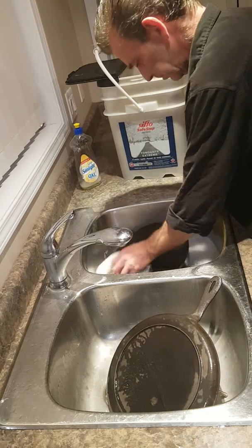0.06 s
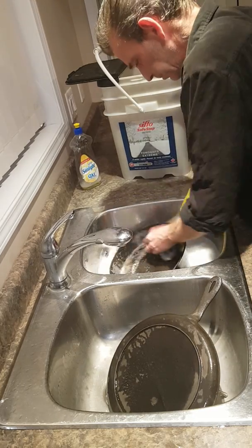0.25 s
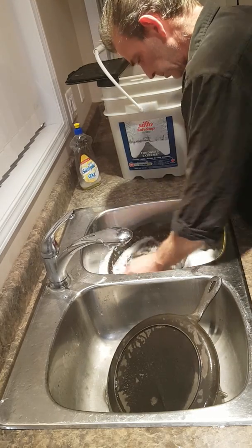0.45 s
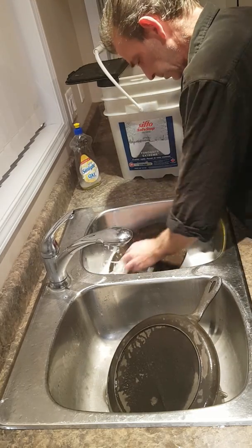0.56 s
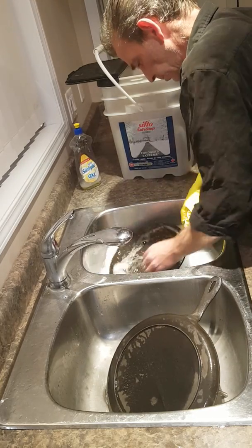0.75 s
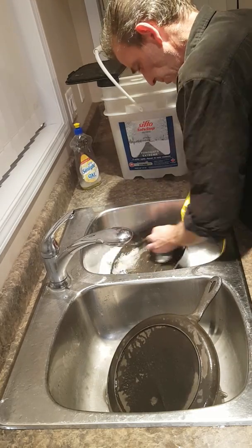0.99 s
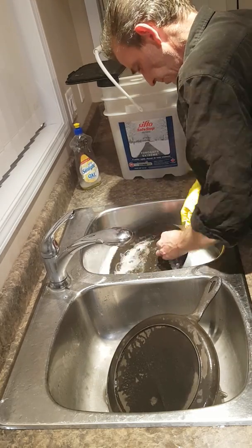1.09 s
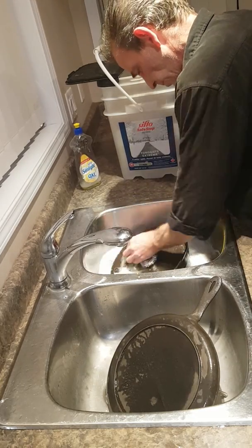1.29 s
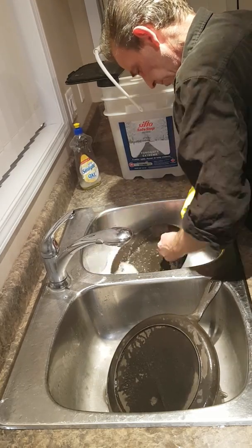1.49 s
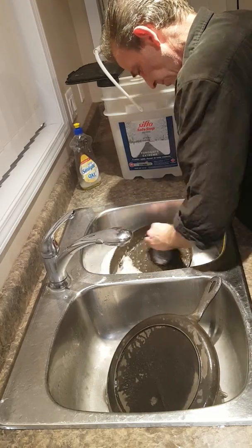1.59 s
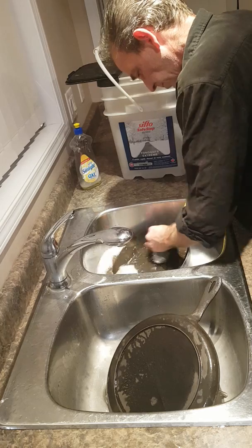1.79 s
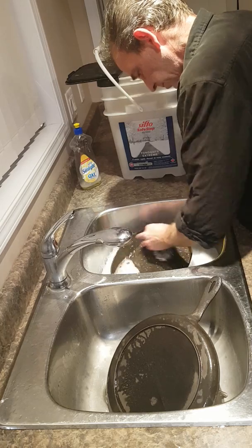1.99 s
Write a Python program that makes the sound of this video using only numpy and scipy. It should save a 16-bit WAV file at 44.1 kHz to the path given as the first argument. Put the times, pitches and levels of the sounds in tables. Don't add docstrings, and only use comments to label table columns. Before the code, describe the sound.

A cast iron pan is scoured in a steel sink, heard close in stereo. A faint stroke opens over quiet room noise and a low appliance hum. From 0.2 s brisk gritty hisses and dull rasps come with clanks and basin booms, clustered near 0.25, 0.75, 1.1 and 1.45-1.55 s. After about 1.6 s knocks fade while bright scrubbing continues to the end at roughly 2 s.

```python
import sys
import numpy as np
from scipy import signal
from scipy.fft import rfft, irfft
from scipy.io import wavfile

SR = 44100
rng = np.random.default_rng(int(sys.argv[2]) if len(sys.argv) > 2 else 0)


def makeup_ratio(level_db):
    decades = np.asarray(level_db, float) / 20
    return 10 ** decades


def bounce(signal):
    frames = np.transpose(np.atleast_2d(signal))
    limited = np.clip(frames, -1, 1)
    pcm = np.round(limited * 32767).astype(np.int16)
    wavfile.write(sys.argv[1], SR, pcm)


N = 90404
T = np.arange(N) / SR


def rms_one(x):
    return x / np.sqrt(np.mean(x ** 2) + 1e-20)


def at_hz(points, hz):
    point_hz, value = np.array(points).T
    return np.interp(np.log(hz), np.log(point_hz), value)


def drift(rate_hz):
    r = np.exp(-80 * np.pi * rate_hz / SR)
    slow = signal.lfilter([1], [1, -2 * r, r * r], rng.standard_normal(N // 40 + 2002))
    slow = slow[2000:]
    return np.interp(np.arange(N) / 40, np.arange(len(slow)), rms_one(slow))


def ring(x, hz, t60, lead=0.):
    r = makeup_ratio(-60 / (t60 * SR))
    w = 2 * np.pi * hz / SR
    return signal.lfilter([np.sin(lead), r * np.sin(w - lead)], [1, -2 * r * np.cos(w), r * r], x + 1e-18)


# frequency in Hz, likeness from 0 to 1.
STEREO_LIKENESS = [(100, 0.95), (300, 0.85), (700, 0.35), (1500, 0.28), (3000, 0.22), (8000, 0.057)]


def bands(source, spectrum):
    hz = np.maximum(np.arange(N // 2 + 1) * SR / N, 1)
    alike = np.clip(at_hz(STEREO_LIKENESS, hz), 0, .99)
    mid, side = rfft(source)
    pair = np.sqrt(1 + alike) * mid + np.sqrt(1 - alike) * side * [[1], [-1]]
    pair = pair * makeup_ratio(at_hz(spectrum, hz)) * (hz > 20)
    pair = pair / np.sqrt(np.mean(irfft(pair.mean(0), N) ** 2))
    for step in range(15, 43):
        overlap = np.clip(1 - abs(3 * np.log2(hz) - step), 0, 1)
        yield 2 ** (step / 3), irfft(pair * overlap, N)


# start in seconds, end in seconds, hiss level in dB, rasp level in dB,
# where in the stroke the speed peaks from 0 to 1.
STROKES = [(0.0, 0.25, -75, -61, 1), (0.225, 0.337, -56.5, -42.5, 0), (0.292, 0.452, -52, -57, 0.83),
           (0.415, 0.633, -44, -60.5, 0.73), (0.605, 0.737, -50, -62, 0.3),
           (0.709, 0.758, -46.5, -44, 0.33), (0.74, 1.06, -45.5, -55, 0.31),
           (1.034, 1.118, -45.5, -48, 0.7), (1.097, 1.231, -45, -43.5, 0.37),
           (1.243, 1.383, -43, -60, 0.39), (1.362, 1.433, -47.5, -53.5, 0.27),
           (1.433, 1.646, -45, -50, 0.26), (1.642, 1.846, -41, -50, 0.56), (1.851, 2.028, -44, -62.5, 0.35),
           (2.032, 2.102, -47.5, -60, 0.57)]
HISS_COLUMN, RASP_COLUMN = 2, 3
# centre in Hz, boost in dB.
CRUST_PATCHES = [(1600, 15.5), (2000, -3), (3000, -5), (3370, 2), (2300, 7.5), (9200, 2.5), (3600, 5.5),
                 (11000, 2.5), (2520, 1.5), (2650, 4), (3000, 4), (3800, 3.5), (2300, -2.5), (3040, -3.5),
                 (3000, -4)]


def speed(column, hz=None):
    squareness = 0.62
    patch_octaves = 0.27
    power = np.zeros(N)
    for stroke, (patch_hz, patch_db) in zip(STROKES, CRUST_PATCHES):
        start, end = stroke[:2]
        span = slice(int(start * SR), int(end * SR))
        u = np.clip((T[span] - start) / (end - start), 0, 1)
        peak = np.clip(stroke[4], .1, .9)
        u = np.where(u < peak, u / peak, (1 - u) / (1 - peak))
        tint_db = 0
        if hz:
            tint_db = patch_db * np.exp(-(np.log2(hz / patch_hz) / patch_octaves) ** 2)
        power[span] += (makeup_ratio(stroke[column] + tint_db) * np.sin(np.pi / 2 * u) ** squareness) ** 2
    return np.sqrt(power)


# frequency in Hz, level in dB per Hz.
ROOM_SPECTRUM = [(30, -3), (75, -2.5), (180, -19), (330, -17), (700, -21), (1500, -21.5), (5000, -26),
                 (15800, -34.5)]
# frequency in Hz, level in dB.
APPLIANCE_HUM = [(252, -57.5), (610, -66)]


def kitchen():
    room_db, hum_t60_s, hum_sway_db = -47.5, 0.17, 4.5
    out = np.zeros((2, N))
    for hz, level_db in APPLIANCE_HUM:
        tone = rms_one(ring(rng.standard_normal(N), hz, hum_t60_s))
        out += makeup_ratio(level_db + hum_sway_db * drift(5)) * tone
    for hz, band in bands(rng.standard_normal((2, N)), ROOM_SPECTRUM):
        out += makeup_ratio(room_db) * band * makeup_ratio(0.55 * drift(1.5))
    return out


# crest in seconds, level in dB, rise in seconds, fall in seconds.
FLOOR_SWINGS = [(.035, -47, 0.034, 0.02), (.1, -47, .03, 0.054), (.213, -37, .015, 0.0059),
                (.281, -23.5, 0.051, 0.0093), (.337, -27, 0.036, 0.031), (.420, -33.5, 0.017, 0.0067),
                (.488, -33, 0.057, 0.049), (.570, -42, 0.027, 0.015), (.743, -26, 0.015, 0.021),
                (.835, -26, 0.048, 0.081), (1.090, -27.5, 0.011, 0.013), (1.186, -24, 0.087, 0.082),
                (1.471, -24, 0.034, 0.019), (1.515, -30, 0.0061, 0.019), (1.573, -28.5, 0.022, 0.052),
                (1.657, -36, 0.017, 0.0061), (1.694, -31.5, .015, 0.015), (1.746, -40, 0.014, 0.077)]
# crest in seconds, level in dB, rise in seconds, fall in seconds.
WALL_SWINGS = [(.008, -43, 0.0091, 0.018), (.242, -20, 0.012, 0.0081), (.280, -26, 0.0091, 0.0091),
               (.306, -28.5, 0.0085, 0.021), (.354, -32, 0.038, 0.057), (.520, -44, 0.073, 0.1),
               (.734, -30, 0.018, 0.013), (.772, -27.5, 0.041, 0.029), (.864, -31.5, 0.018, 0.011),
               (1.088, -24, 0.018, 0.026), (1.146, -29, 0.026, 0.024), (1.207, -40.5, 0.026, 0.045),
               (1.361, -46, 0.032, 0.12), (1.465, -31.5, 0.027, 0.019), (1.538, -30, 0.012, 0.006),
               (1.575, -35, 0.018, 0.0093), (1.627, -34, 0.039, 0.045), (.7, -47, .015, 0.009),
               (1.9, -51, 0.04, 0.095)]


def boom():
    rub_db, fall_shape, pan_db = -40, 1.36, -2.5
    floor = (FLOOR_SWINGS, 72, 0.15, 0)   # swings, Hz, t60 s, left lead rad
    walls = (WALL_SWINGS, 129, 0.19, 0.48)
    out = np.zeros((2, N))
    for swings, hz, t60, lead in (floor, walls):
        rub = speed(RASP_COLUMN) * makeup_ratio(rub_db) * rng.normal(0, 1, N)
        out += ring(rub, hz, t60)
        for crest, level_db, rise, fall in swings:
            u = T - crest
            swell = np.cos(np.pi / 2 * np.clip(u / rise, -1, 0))
            decay = np.exp(-(abs(u) / fall) ** fall_shape)
            swing = np.cos(2 * np.pi * hz * u + [[lead / 2], [-lead / 2]])
            out += makeup_ratio(level_db) * np.where(u < 0, swell, decay) * swing
    return out * makeup_ratio([[pan_db / 2], [-pan_db / 2]])


# time in seconds, level in dB, chatter length in seconds,
# brightness in dB per octave, level of the pan's own ring in dB.
KNOCKS = [(0.196, -43, 0.0075, 5.5, 8), (0.23, -23.5, 0.01, 4.5, 3.5), (0.239, -27, 0.0067, 4, 17.5),
          (0.251, -20, 0.035, -0.5, 12.5), (0.293, -23.5, 0.08, -4, -10), (0.443, -32, 0.045, -2.5, 2),
          (0.724, -15.5, 0.012, -1.5, -1.5), (0.736, -25.5, 0.083, 2, 4.5), (0.785, -23, 0.042, -1.5, -6),
          (1.07, -19, 0.015, 1.5, 8), (1.081, -21.5, 0.079, -4.5, 3.5), (1.136, -32, 0.057, 5, -10),
          (1.206, -44, 0.04, -5, 8), (1.257, -49, 0.022, 7, 0), (1.423, -25.5, 0.016, 1, 1),
          (1.438, -28, 0.12, -3, -14), (1.454, -33.5, 0.034, -8.5, 5), (1.53, -28, 0.018, -3, -11),
          (1.543, -24.5, 0.057, -6, -3), (1.583, -44.5, 0.056, 9, -20), (1.746, -38.5, 0.033, 3.5, -12),
          (1.767, -44, 0.013, -5, -14)]
# low mode in Hz, boost in dB, high mode in Hz, boost in dB.
LANDING_SEATS = [(230, 2, 1000, 5), (226, 13, 1290, 5), (600, 6.5, 870, 11), (423, 9, 1200, 0),
                 (600, 5, 970, 11), (303, 6, 1100, 7), (230, 5, 1010, 9), (467, 11, 985, 11),
                 (242, 20, 1290, 4), (605, 6.5, 1095, 5), (443, 7, 920, 9), (540, 9, 1290, 5),
                 (570, 12, 1090, 2), (600, 13, 1000, -5), (262, 7.5, 760, 1), (540, 3, 1100, -9),
                 (231, 3, 1490, 3), (600, 0, 1300, 12), (437, 5, 1000, -3), (450, 9, 1500, -1),
                 (600, 10, 900, -10), (262, 19.5, 900, -8)]
# frequency in Hz, level in dB, t60 in seconds,
# left over right in dB, left lead in radians.
SHEET_MODES = [(214.6, -6.5, 0.076, -1.5, 1.07), (260.2, -13.5, 0.26, -2, -0.15),
               (314.7, -4.5, 0.095, 2, 0.25), (448, -5, 0.072, -3, 0.33), (469.4, -11.5, 0.12, -8.5, 0.52),
               (524, -7.5, 0.077, 3.5, -0.24), (605.5, -7.5, 0.092, 0, 1.05), (886, -16.5, 0.14, -4, 1.5),
               (944, -13.5, 0.068, 3, 1.2), (997, -15, 0.15, -2, 2.04), (1105, -10, 0.055, -8.5, -1),
               (1282, -12, 0.04, 8.5, -1.36), (1550, -18.5, 0.13, -1, 1.9), (1810, -17.5, 0.039, 9, 1.3)]
# frequency in Hz, level in dB per Hz.
CLATTER_SPECTRUM = [(180, 10), (400, 7), (1000, 2.5), (2000, -1), (4000, -14), (8000, -24), (15000, -42)]


def sheet():
    strike_db, first_strike_db, clatter_db, rub_db = -16, 8.5, -16.5, -24.5
    chatter_per_s, contact_hz, pan_ring_hz = 350, 2420, 317
    seat_width = 0.071
    soften = 0.33
    clatter_t60_s, clatter_fall = .13, 0.63
    s, db, length, bright_db, own_db = np.transpose(KNOCKS)
    seat_hz, seat_db = np.transpose(LANDING_SEATS)[0::2], np.transpose(LANDING_SEATS)[1::2]
    since = T - s[:, None]
    shape = np.exp(-np.clip(since, 0, 1) / length[:, None])
    shape = shape * (since >= 0) * (since < 2 * length[:, None])
    touch = 1. * (rng.random(N) < chatter_per_s / SR)
    rub = speed(RASP_COLUMN) * makeup_ratio(rub_db)
    dull = np.exp(-2 * np.pi * contact_hz / SR)
    out = np.zeros((2, N))
    for hz, level_db, t60, pan_db, lead in SHEET_MODES:
        favour_db = np.sum(seat_db * np.exp(-(np.log(hz / seat_hz) / seat_width) ** 2), axis=0)
        favour_db = favour_db + own_db * (abs(np.log(hz / pan_ring_hz)) < .1)
        force = makeup_ratio(db + bright_db * np.log2(hz / 400) + favour_db) @ shape
        chatter = touch * rng.choice([-1, 1], N) * rng.uniform(0.47, 1.0, N)
        clicks = makeup_ratio(strike_db) * force * chatter + rub * rng.normal(0, 1, N)
        landing = (np.ceil(s * hz) / hz * SR).astype(int)
        hardness = (length / .01) ** -soften * rng.uniform(.7, 1.3, len(s))
        clicks[landing] += makeup_ratio(strike_db + first_strike_db) * force[landing] * hardness
        clicks = makeup_ratio(level_db) * signal.lfilter([1 - dull], [1, -dull], clicks)
        left = makeup_ratio(pan_db / 2) * ring(clicks, hz, t60, lead / 2)
        right = makeup_ratio(-pan_db / 2) * ring(clicks, hz, t60, -lead / 2)
        out += [left, right]
    for hz, band in bands(rng.standard_normal((2, N)), CLATTER_SPECTRUM):
        r = makeup_ratio(-120 / (SR * clatter_t60_s * (hz / 500) ** -clatter_fall))
        force = makeup_ratio(db + bright_db * np.log2(hz / 400)) @ shape
        energy = signal.lfilter([1 - r], [1, -r], force ** 2)
        out += makeup_ratio(clatter_db) * np.sqrt(energy) * band
    return out


def grit():
    catches_per_s, spread_db = 9000, 1.5
    sizes = makeup_ratio(spread_db * np.minimum(rng.exponential(1, (2, N)), 5))
    sizes = sizes * rng.choice([-1, 1], (2, N))
    return sizes * (rng.random((2, N)) < catches_per_s / SR)


def scour(spectrum, column, brighten, pace, shared):
    patchy_db = 1.5
    out = np.zeros((2, N))
    for hz, band in bands(grit(), spectrum):
        brightness = pace ** (brighten * np.log2(hz / 5000))
        patchiness = makeup_ratio(patchy_db * (.15 * shared + drift(25)))
        out += speed(column, hz) * band * brightness * patchiness
    return out


# frequency in Hz, level in dB per Hz.
HISS_SPECTRUM = [(1200, -10), (2000, 1.5), (3000, 1.5), (5000, 3.5), (9000, -1), (15800, -6.5)]
# frequency in Hz, level in dB per Hz.
RASP_SPECTRUM = [(300, 11), (800, 6), (1500, 4.5), (2500, 5.5), (3500, -2), (5000, -24)]
# frequency in Hz, level in dB, t60 in seconds.
IRON_MODES = [(1374, -13.5, 0.085), (1543, -16, 0.061), (2014, -16, 0.12), (2290, -32, 0.06),
              (2528, -13, 0.19), (2940, -16, 0.14), (3544, -15, 0.18), (4570, -19, .1), (5800, -16, .04),
              (6150, -14, 0.094)]


def pad():
    iron_sway_db = 6
    shared = drift(31)
    fast = speed(HISS_COLUMN)
    fast_rms = np.sqrt(np.mean(fast ** 2))
    pace = np.clip(fast / makeup_ratio(-47), .1, 3)
    hiss = scour(HISS_SPECTRUM, HISS_COLUMN, 0.2, pace, shared)
    rasp = scour(RASP_SPECTRUM, RASP_COLUMN, 0, pace, shared)
    catches = grit() * fast / fast_rms
    iron = np.zeros((2, N))
    for hz, level_db, t60 in IRON_MODES:
        iron += makeup_ratio(level_db) * rms_one(ring(catches * makeup_ratio(iron_sway_db * drift(1.9)), hz, t60))
    return hiss + rasp + iron * fast_rms


def scene():
    return kitchen() + boom() + sheet() + pad()


# frequency in Hz, gain in dB.
LEFT_PORT = [(130, 0.5), (2500, -1), (5900, -2.5), (7200, -3), (8700, -8), (9200, 0.5), (12000, 2.5),
             (15800, 2.5)]
# frequency in Hz, gain in dB.
RIGHT_PORT = [(130, 1), (5000, -1.4), (5900, 5.5), (6600, 0.5), (7900, -63), (8700, -5), (9300, -6.5),
              (15800, -5)]


def microphones(dry):
    low_cut_hz, cutoff_hz = 42, 15800
    hz = np.maximum(np.arange(N + 1) * SR / N / 2, 1)
    ports = makeup_ratio([at_hz(LEFT_PORT, hz), at_hz(RIGHT_PORT, hz)])
    ports = ports * (hz < cutoff_hz) / np.sqrt(1 + (low_cut_hz / hz) ** 8)
    return irfft(rfft(dry, 2 * N) * ports)[:, :N]


def band_limit(x):
    return signal.sosfilt(signal.butter(12, 16560, fs=SR, output="sos"), x)


def record(dry):
    mix = microphones(dry)
    return band_limit(mix)


dry = scene()
out = record(dry)
bounce(out)
```